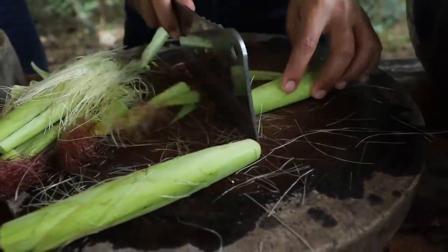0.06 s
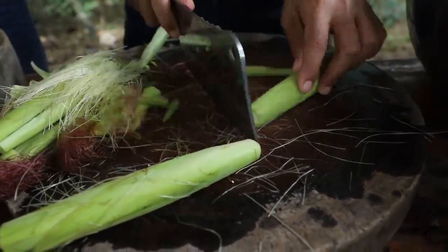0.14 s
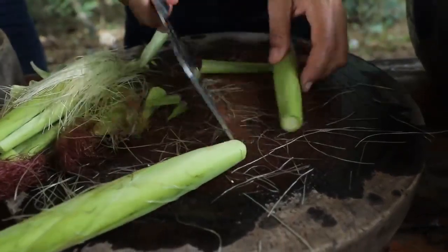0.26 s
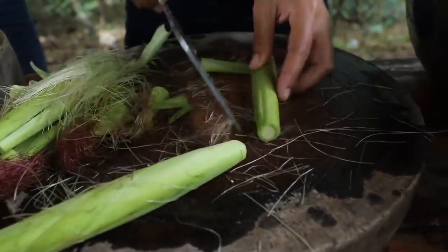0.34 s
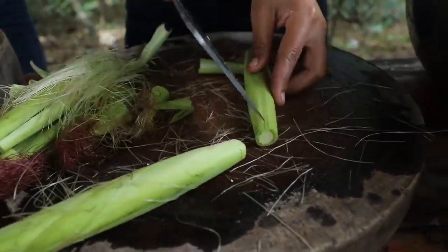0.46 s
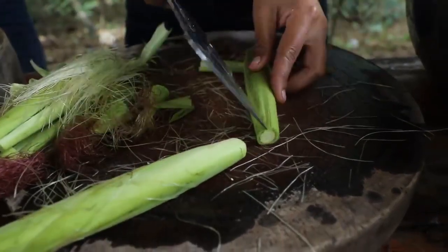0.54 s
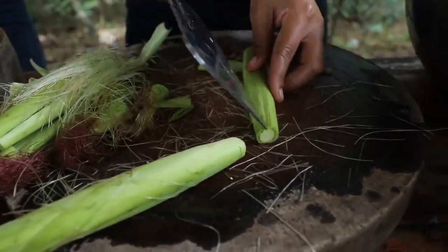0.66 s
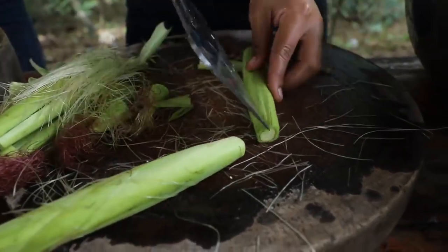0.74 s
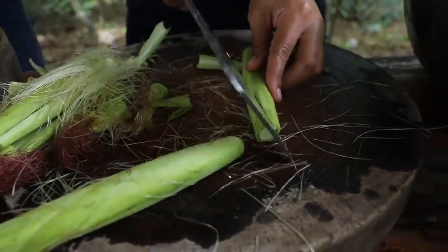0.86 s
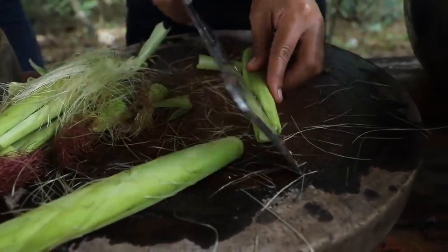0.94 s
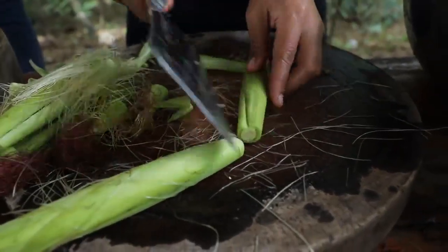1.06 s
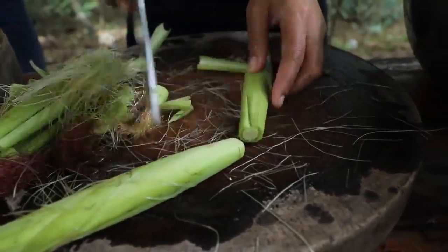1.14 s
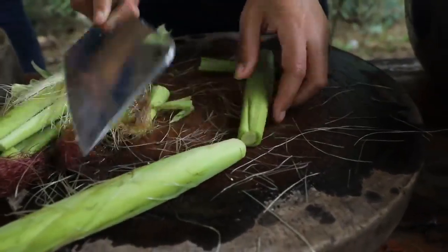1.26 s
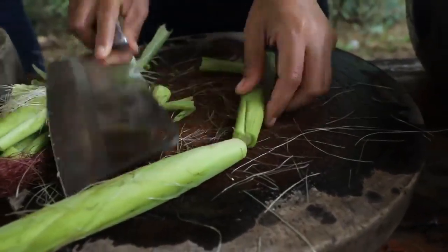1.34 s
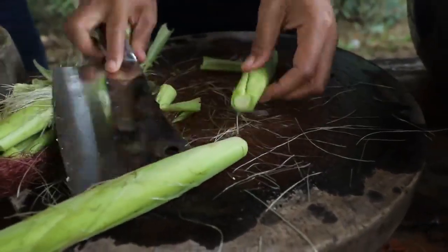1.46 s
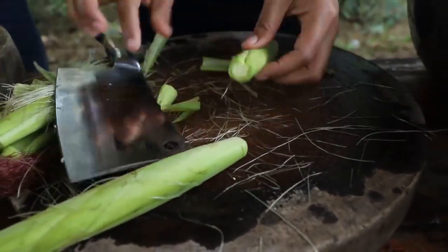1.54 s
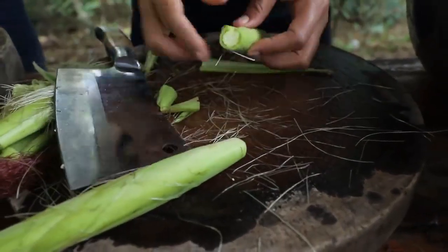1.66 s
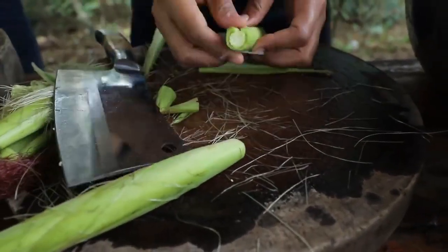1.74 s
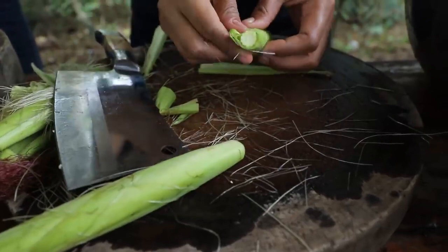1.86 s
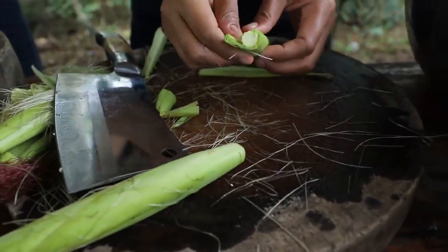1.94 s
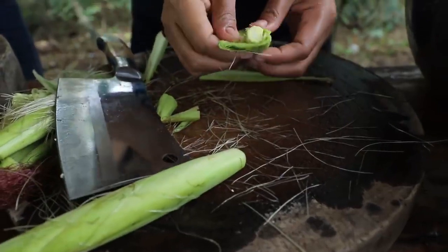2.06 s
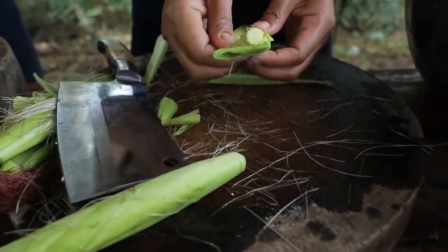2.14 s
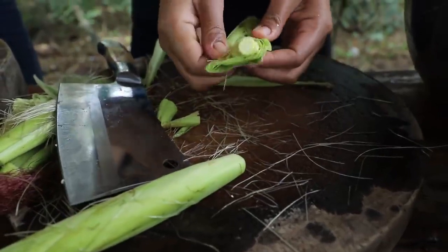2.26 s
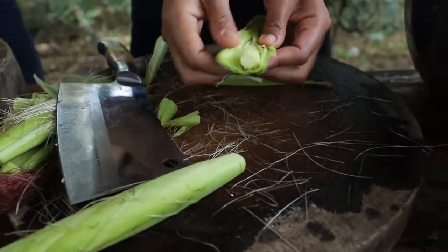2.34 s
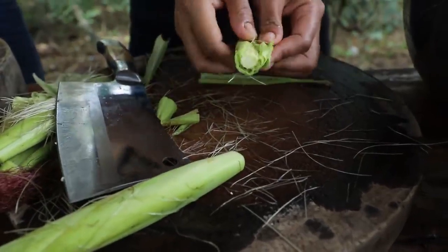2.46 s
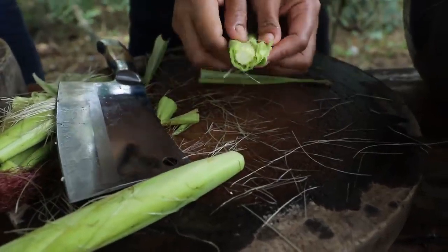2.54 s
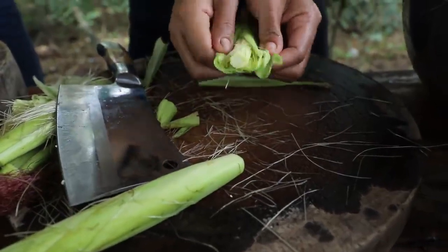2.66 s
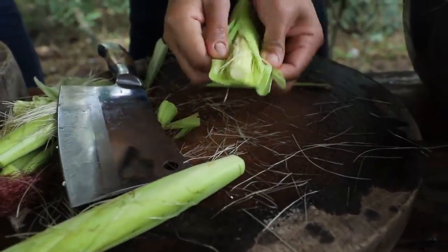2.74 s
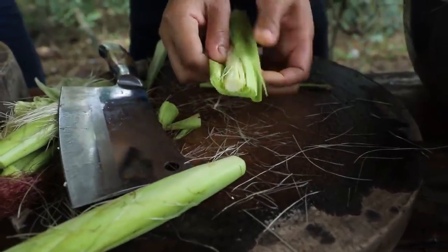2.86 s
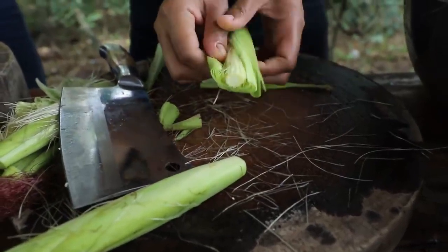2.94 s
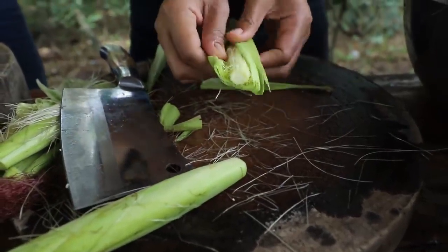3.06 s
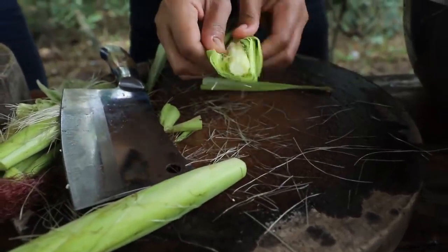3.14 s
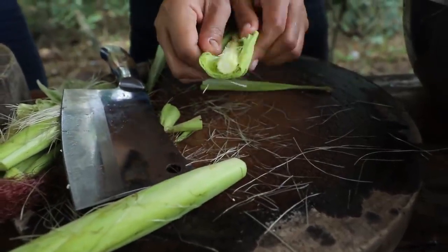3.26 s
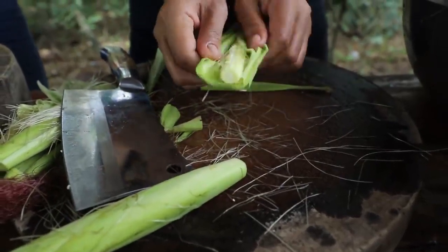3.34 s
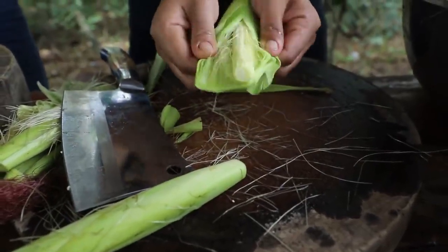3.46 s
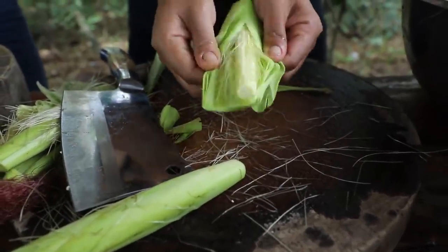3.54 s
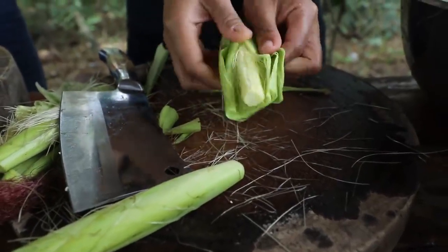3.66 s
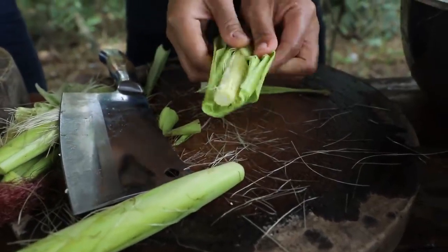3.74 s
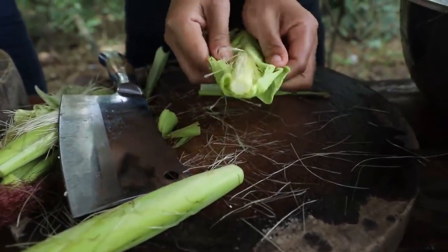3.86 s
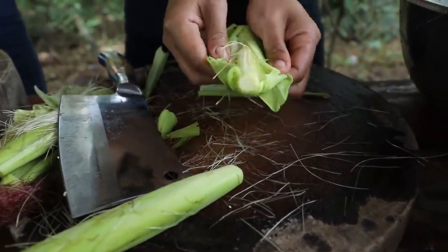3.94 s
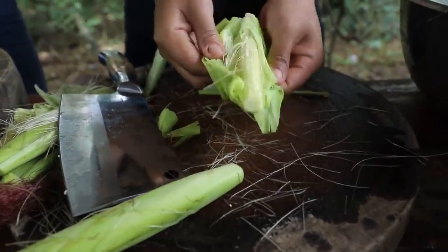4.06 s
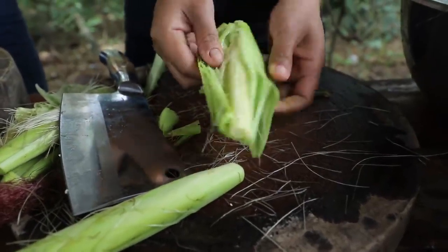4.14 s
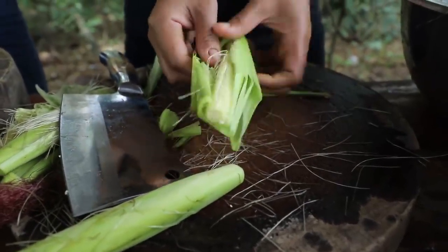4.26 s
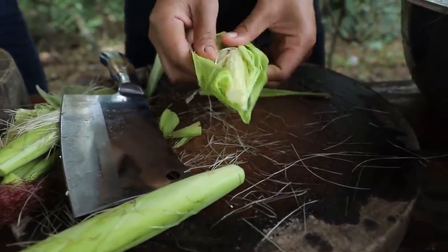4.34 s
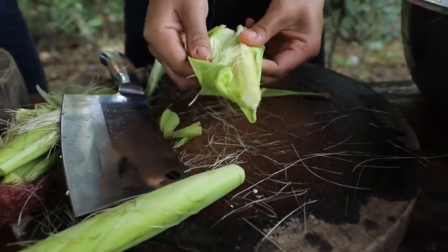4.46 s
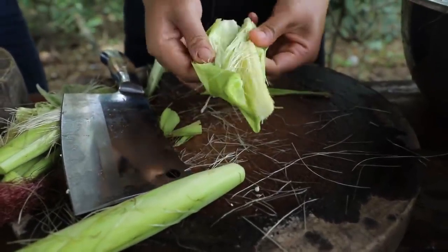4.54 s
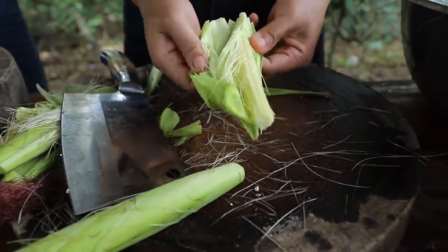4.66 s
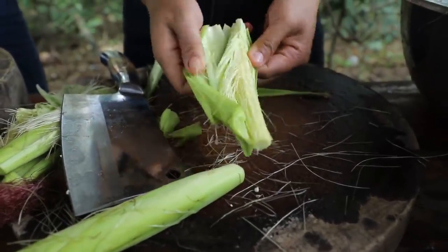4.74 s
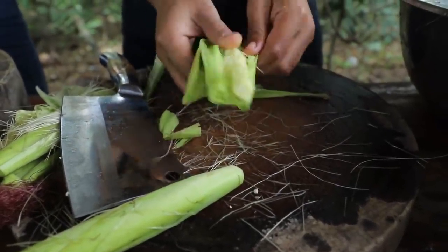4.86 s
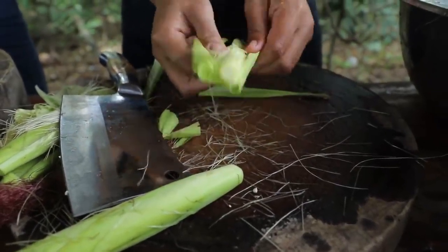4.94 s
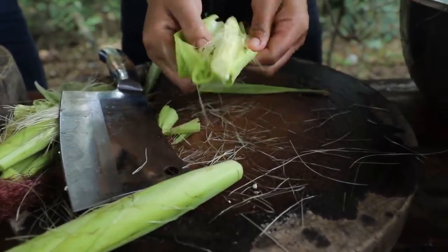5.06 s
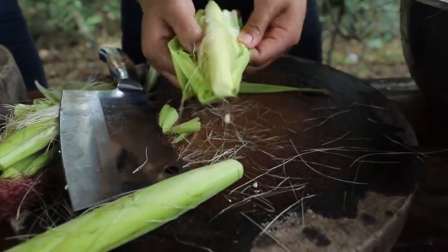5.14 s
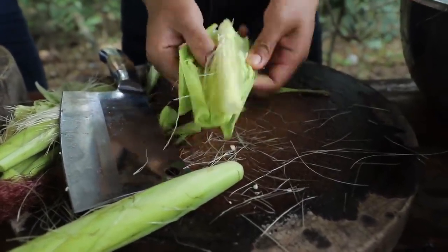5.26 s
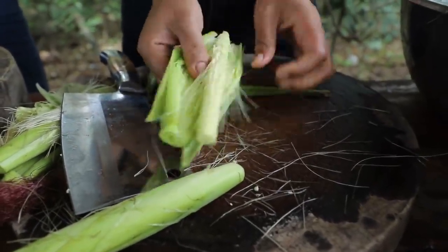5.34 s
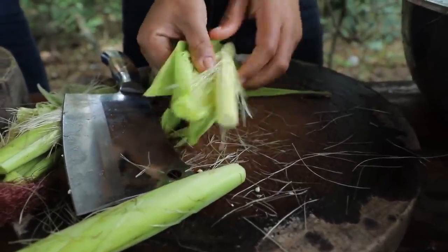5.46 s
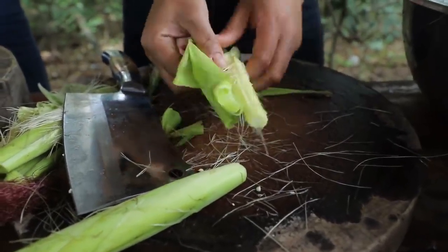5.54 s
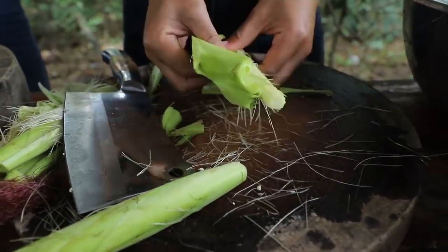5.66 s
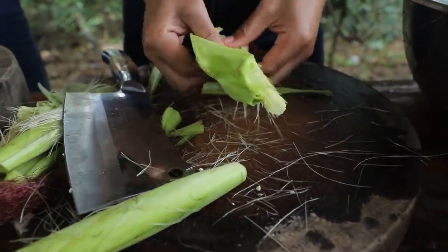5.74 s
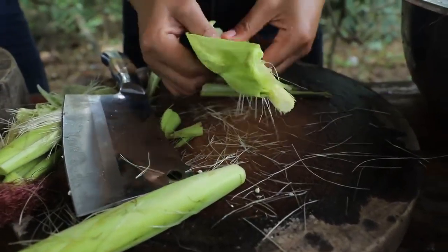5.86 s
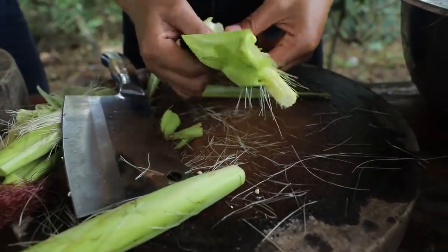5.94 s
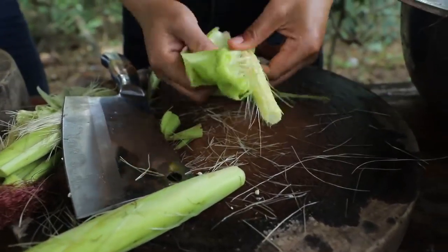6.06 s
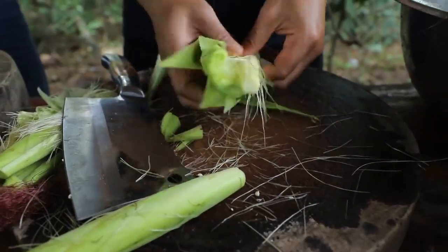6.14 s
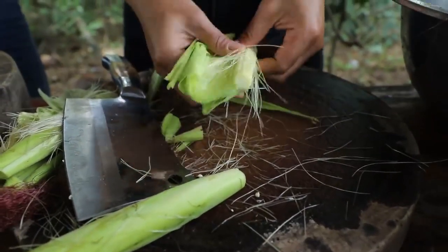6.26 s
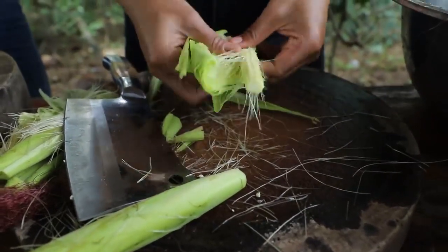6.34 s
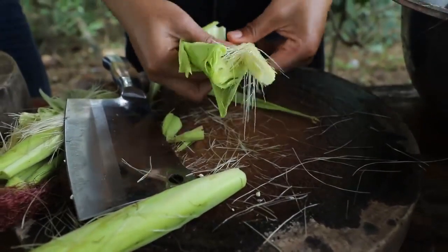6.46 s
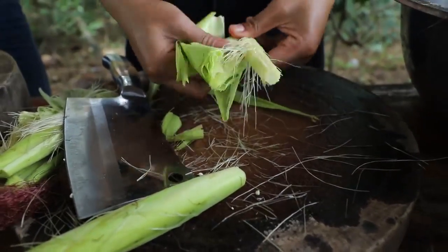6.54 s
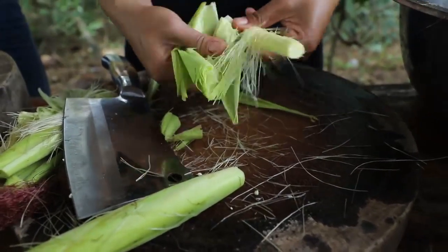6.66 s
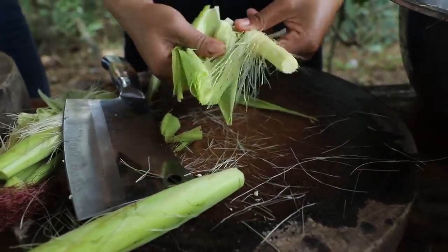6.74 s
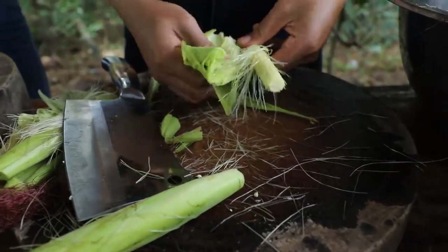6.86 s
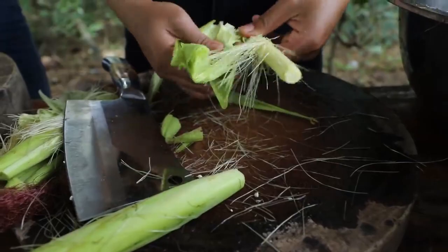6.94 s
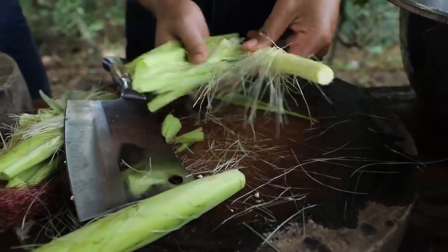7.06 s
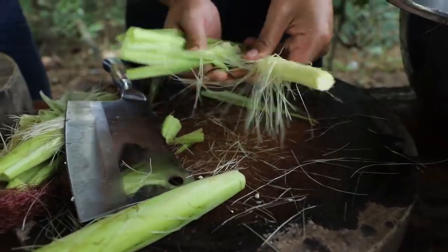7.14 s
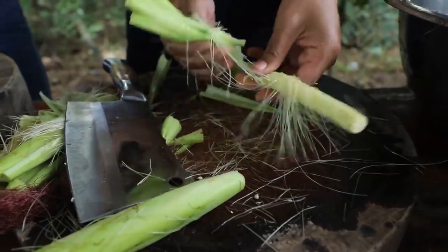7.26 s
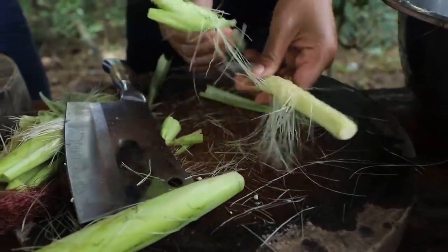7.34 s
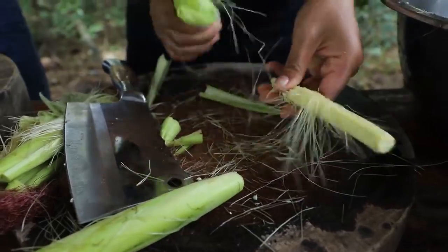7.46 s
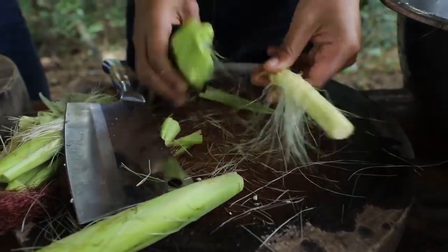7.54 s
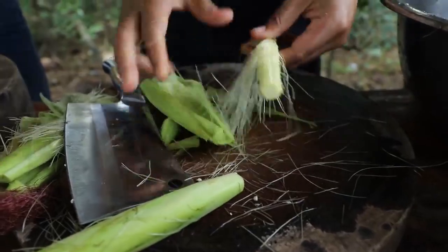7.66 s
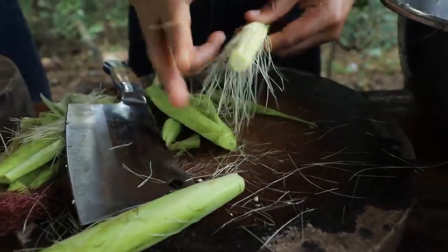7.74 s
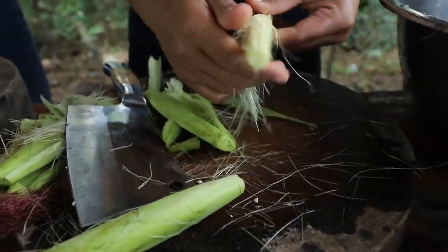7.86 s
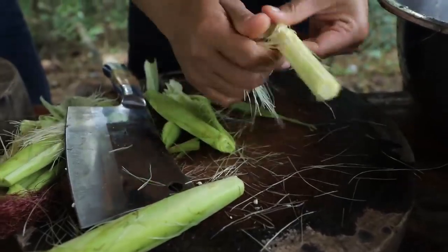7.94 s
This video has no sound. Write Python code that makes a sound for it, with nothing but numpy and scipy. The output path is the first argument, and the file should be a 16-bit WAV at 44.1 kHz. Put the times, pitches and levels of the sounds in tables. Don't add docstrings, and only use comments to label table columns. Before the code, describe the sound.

Outdoors, one loud chop and dry blade scrapes, a metallic clatter, then close crisp popping and tearing of fresh green corn husk.

```python
import sys
import numpy as np
from scipy import signal
from scipy.io import wavfile
from scipy.ndimage import uniform_filter1d

SR = 44100
rng = np.random.default_rng(int(sys.argv[2]) if len(sys.argv) > 2 else 0)


def amplitude_ratio(level_db):
    exponent = np.asarray(level_db, float) / 20
    return 10 ** exponent


def output_pcm(signal):
    pcm = np.clip(np.atleast_2d(signal).T, -1, 1) * 32767
    wavfile.write(sys.argv[1], SR, np.round(pcm).astype(np.int16))


N = 353239
TIME_S = np.arange(N) / SR

# (frequency [Hz], density [dB per Hz])
AIR_SPECTRUM = [(24, -10), (62, -2.5), (90, 2.5), (270, -7.5), (540, -12), (840, -11), (2600, -26.5),
                (4600, -23.5), (6000, -31), (10000, -41.5), (16500, -50)]
# (start [s], merge into held note [s], end [s], first pitch [Hz], last pitch [Hz])
SONGS = [
    (-.15, .38, .47, 4850, 4250),
    (.55, .565, .64, 4290, 4280),
    (1.85, 2.36, 2.47, 4050, 3580),
    (3.88, 4.37, 4.488, 5300, 4750),
    (4.7, 5.135, 5.19, 4600, 4200),
    (5.4, 5.88, 5.9, 4000, 3330),
    (7.6, 7.95, 7.995, 4300, 3980),
]
SONG_LEVELS = [-47.5, -52, -58, -46.5, -50, -51.5, -55.5]

# (time [s], ring [dB], crack [dB], contact hardness as cut-off [Hz])
CHOP = [
    (.1672, -30.5, 14, 8900),
    (.173, 28.5, 18, 2526),
    (.19, 16.5, -11, 900),
]
TICK = [
    (.399, -42, -48, 12100),
    (.43, -58, -55, 12000),
    (.667, -59, -52, 12000),
    (1.226, -45.5, -40, 7900),
]
LAID_DOWN = [
    (1.5335, -7, 6.5, 2630),
    (1.5385, -23.5, 1.5, 5750),
    (1.582, -37, -18, 9100),
]
CLATTER = [
    (2.809, -7.5, 4, 9280),
    (2.837, -34, -15.5, 14000),
    (2.876, -13.5, 1, 3320),
    (2.9335, -7, -7.5, 8500),
    (2.965, -37, -9, 5000),
]
BOUNCES = [
    (2.906, -23, -16, 2540),
    (2.984, -26.5, -17, 2620),
    (2.999, -34, -16, 2000),
    (3.012, -31, -39, 2040),
    (3.036, -34, -43, 1950),
    (3.047, -32, -34, 1900),
    (3.057, -38, -26, 1900),
]
DROPPED = [
    (.001, -34, -33, 700),
    (7.071, -24, -29, 1040),
]

# (frequency [Hz], level [dB], t60 [s])
BLOCK_MODES = [(77, -28, .22), (545, -23, .08), (207, -15, .16), (1696, -26, .1), (452, -21, .1),
               (620, -22, .1), (711, -60, .7), (937, -61, .6), (1084, -56.5, .9), (533, -58, .6),
               (856, -22, .09), (1035, -4, .06), (1265, -26, .1)]
# (frequency [Hz], level [dB], t60 [s])
BLADE_HELD_MODES = [(2450, -7, 0.3), (4430, 6.5, 0.034), (6460, 4, 0.07), (7400, -3, 0.12),
                    (8380, -4, 0.19), (9141, -4, 0.2), (10070, -1, 0.087), (11100, -2, 0.11),
                    (13100, -3, .1), (15300, -11, .07)]
# (frequency [Hz], level [dB], t60 [s])
BLADE_FLAT_MODES = [(76.8, -6, .3), (170, 3, .085), (1100, 6, .062), (395, -2, .07), (630, -8, .14),
                    (1662, 1, .16), (2444, -2.5, .18), (2772, 0, .22), (3488, -12, .2), (4958, 0, .08),
                    (5950, 0, .06), (1400, -16, .17), (2288, -15, .12), (112, -4, .1)]
# (frequency [Hz], level [dB], t60 [s])
BLADE_LOOSE_MODES = [(74, -11.5, .3), (172, -6, .077), (1170, -3, .043), (2850, -4, .03), (1846, -10, .15),
                     (625, -10, .12), (1518, 0, .16), (2360, -4, .07), (4065, -12, .12), (4576, -10.5, .22),
                     (5170, -6.5, .22), (5875, -12, .09), (6551, -18, .22), (8977, -11, .13),
                     (1766, 2, .035), (8300, -8, .03), (4720, 3, .025), (3698, -17, .1), (985, -17, .12),
                    (7290, -15, .08), (8834, -16, .15), (11350, -21, .1), (12460, -15, .05),
                    (14410, -22, .12), (15380, -22, .12)]
# (frequency [Hz], level [dB], t60 [s])
HANDLE_MODES = [(170, -1, 0.094), (636, 2.5, 0.095), (1494, 3, 0.1), (1770, 13.5, 0.052), (1030, -1, 0.1)]
# (frequency [Hz], level [dB], t60 [s])
BOARD_MODES = [(297, 0.5, 0.1), (705, -7.5, 0.3), (1010, -3, 0.1), (1187, -4, 0.12)]

# (loudest [s], level [dB], swell [s], fade [s], top end against middle [dB])
SCRAPES = [(.22, -37.5, 0.042, 0.21, -31.5), (0.469, -35, 0.066, 0.098, -28),
           (0.514, -35, 0.092, 0.039, -16.5), (.58, -50, 0.071, 0.026, -20.5),
           (0.936, -39.5, 0.022, .12, -7.5), (1.045, -32, 0.16, 0.046, -13.5),
           (1.212, -35, 0.068, 0.031, -18), (1.4, -46.5, 0.11, 0.16, -14),
           (1.765, -36.5, 0.076, 0.055, -23), (2.79, -37, 0.12, 0.23, -17), (3.105, -45, 0.032, 0.046, -31)]
# (loudest [s], level [dB], swell [s], fade [s])
PULLS = [(2.185, -35, 0.17, 0.064), (2.315, -36.5, 0.21, 0.071), (2.519, -43.5, 0.072, 0.087),
         (3.527, -35.5, 0.22, 0.35), (3.86, -44, 0.51, 0.094), (3.97, -31.5, 0.013, 0.049),
         (4.131, -35.5, 0.078, 0.11), (4.563, -31, 0.054, 0.073), (4.66, -40.5, 0.53, 0.72),
         (4.735, -21, 0.0083, 0.019), (4.799, -25, 0.0055, 0.018), (4.874, -39, 0.032, 0.28),
         (5.104, -39.5, 0.3, 0.014), (5.195, -20.5, 0.0093, 0.022), (5.3, -34.5, 0.14, 0.038),
         (5.468, -43.5, 0.14, 0.061), (5.577, -39, 0.06, 0.076), (5.662, -33.5, 0.031, 0.029),
         (5.937, -42.5, 0.14, 0.02), (6.056, -46.5, 0.093, 0.28), (6.271, -31, 0.025, 0.054),
         (6.585, -53, 1, 0.012), (6.765, -35, 0.076, 0.089), (7.024, -39.5, 0.055, 0.033),
         (7.12, -50, 1, 1), (7.332, -33, 0.1, 0.081), (7.498, -40.5, 0.1, 0.058),
         (7.69, -38.5, 0.022, 0.044), (7.784, -32, 0.066, 0.033), (7.907, -41.5, 0.038, 0.031)]
# (frequency [Hz], density [dB per Hz])
LEAF_SPECTRUM = [(400, -22), (800, -11), (1500, -4), (2300, -2), (3300, -4), (4500, 0), (5500, -4),
                 (11000, -14)]

# (time [s], peak [dB], leaf resonance [Hz])
NICKS = [(0.318, -39, 8020), (0.3648, -41.5, 9500), (0.9162, -27, 5000), (0.9685, -26, 3830),
         (1.0016, -27, 5220), (1.0363, -33, 4300), (1.1998, -34, 2890), (1.2183, -21, 4740),
         (1.2266, -20.5, 3400), (1.729, -22, 3750), (1.7748, -32.5, 1220), (1.8059, -30.5, 4560),
         (2.1338, -29, 4800), (2.1377, -26, 3700), (2.169, -26.5, 5400), (2.1957, -18.5, 4630),
         (2.2043, -24.5, 4600), (2.229, -27.5, 4500), (2.2535, -35, 4310), (2.3033, -28, 3450),
         (2.339, -35, 4630), (2.363, -30.5, 4630), (2.3673, -33.5, 1900), (2.7007, -29, 2070),
         (2.7356, -30, 4520), (2.76, -29.5, 6000), (2.7682, -26.5, 4280), (2.7756, -20, 4590),
         (2.78, -21.5, 4330), (2.7839, -21.5, 4540), (2.7863, -16.5, 4800), (2.7944, -22, 6000),
         (2.7989, -22, 2860), (3.261, -33, 2280), (3.298, -38.5, 2530), (3.3976, -28, 4940),
         (3.4383, -17.5, 4850)]
# (time [s], peak [dB], leaf resonance [Hz])
JUICY_SNAPS = [(3.4627, -33, 4130), (3.4661, -34.0, 2136), (3.4778, -27.5, 3240), (3.484, -30, 2220),
               (3.5079, -20.5, 2130), (3.5182, -28, 4220), (3.522, -28, 4580), (3.5384, -20, 4960),
               (3.554, -30, 2525), (3.5528, -29, 2074), (3.5641, -32, 2070), (3.5758, -34.5, 2070),
               (3.5896, -20, 2820), (3.5948, -23, 4650), (3.6125, -21, 4020), (3.6193, -31, 4290),
               (3.6417, -31.5, 4590), (3.6734, -21.5, 5800), (3.7256, -19, 5700), (3.7357, -28, 5540),
               (3.7408, -25, 4530), (3.7476, -27.5, 2070), (3.764, -24.5, 3940), (3.879, -24, 2200),
               (3.9539, -21, 2385), (3.958, -14.5, 2320), (3.964, -16.5, 2630), (3.9654, -22.5, 2077),
               (3.9702, -24, 2500), (3.9751, -28, 1720), (3.9842, -26, 2540), (3.988, -17.5, 4260),
               (3.9903, -11, 3960), (3.9975, -17, 2370), (4.0042, -9.5, 2900), (4.0078, -19, 3020),
               (4.0102, -23.5, 4650), (4.015, -22, 4730), (4.022, -23.5, 4660), (4.0249, -34, 2920),
               (4.03, -29, 4920), (4.053, -32, 4740), (4.062, -20, 4210), (4.07, -18, 1904),
               (4.0819, -13, 4300), (4.0994, -19, 4460), (4.112, -37, 2760), (4.1175, -18, 2930),
               (4.1246, -7, 3520), (4.127, -28.5, 4050), (4.139, -31, 4400), (4.1465, -40, 3180),
               (4.154, -28, 4160), (4.165, -33, 2074), (4.172, -32, 2760), (4.177, -29, 4310),
           (4.1905, -34, 2410), (4.2069, -15.5, 2904), (4.208, -20.5, 3730), (4.2173, -37, 2930),
           (4.3018, -29.5, 4900), (4.5435, -26, 3760), (4.555, -19, 3140), (4.559, -22, 3890),
           (4.5637, -17, 4030), (4.5692, -25, 3030), (4.5772, -22, 3120), (4.5875, -26, 2670),
           (4.6026, -32, 4220), (4.6338, -16.5, 4260), (4.6436, -16.5, 2500), (4.649, -36, 2230),
           (4.6604, -17.5, 6720), (4.6627, -29, 4760), (4.6762, -22, 4890), (4.681, -28, 4840),
           (4.696, -20, 4900), (4.7081, -13, 6460), (4.8677, -19, 5400), (4.7259, -14.5, 2070),
           (4.736, -13.5, 3700), (4.7434, -29, 4990), (4.7663, -26, 2100), (4.7902, -20, 5100),
           (4.796, -23, 5000), (4.804, -21, 3500), (4.807, -22, 4490), (4.8104, -24, 4910),
           (4.825, -29, 5000), (4.8407, -34.5, 4660), (4.8495, -24, 3540), (4.8591, -28, 3530),
           (4.8637, -11, 5440), (4.8765, -22, 5300), (4.881, -27.0, 5450), (4.8904, -22.5, 5560),
           (4.9518, -27.5, 4190),
               (5.052, -37, 3270), (5.091, -23, 4050), (5.095, -16.5, 2800), (5.107, -23, 4890),
             (5.1237, -32, 7600), (5.1768, -35, 7840), (5.182, -10.5, 3820), (5.188, -25.5, 2760),
             (5.1929, -35, 4390), (5.1965, -14.5, 5070), (5.1967, -15, 4360), (5.2046, -14.5, 3960),
             (5.2081, -27, 4030), (5.2173, -27, 4570), (5.222, -30, 4740), (5.2312, -34, 4130),
             (5.2332, -26, 5860), (5.2362, -29, 7240), (5.242, -19, 6000), (5.2496, -28, 6890),
             (5.2523, -18, 4390), (5.2588, -13.5, 4470), (5.2638, -25, 3880), (5.2666, -17, 4430),
             (5.2704, -35, 4570), (5.283, -24, 4180), (5.2844, -18.5, 4800), (5.2973, -37, 4650),
             (5.298, -32, 4220), (5.3056, -1.5, 5160), (5.307, -5.5, 4720), (5.3115, -11.5, 4360),
             (5.325, -22, 4330), (5.3336, -24, 4200), (5.3437, -22.5, 4810), (5.3479, -26, 4480),
             (5.3614, -33.5, 4420), (5.5713, -27.5, 2110), (5.634, -40, 12000), (5.655, -22.5, 5200),
             (5.658, -21.5, 4700), (5.662, -25, 4860), (5.731, -29.5, 3870), (5.8055, -30, 5400),
             (5.823, -22.5, 5100), (5.8426, -29, 4430), (5.866, -28.5, 6460), (5.9246, -26.5, 2330),
             (5.939, -29, 4500), (5.9541, -35, 4540), (6.0463, -30, 4610), (6.0536, -30, 4740)]
# (time [s], peak [dB], leaf resonance [Hz])
CRISP_SNAPS = [(6.2681, -27.5, 3810), (6.3035, -34, 4940), (6.3508, -23.5, 7540), (6.516, -18.5, 3080),
               (6.5206, -29, 4560), (6.537, -32, 9000), (6.5585, -21.0, 5160), (6.6004, -9, 4800),
               (6.606, -22, 4690), (6.6148, -28.5, 3340), (6.616, -6, 6600), (6.6285, -11.5, 5300),
               (6.648, -9.5, 2800), (6.6605, -27, 5140), (6.665, -38, 5440), (6.682, -25, 6120),
               (6.6972, -23.5, 6250), (6.7062, -26, 4430), (6.7154, -35, 3960), (6.731, -27, 5200),
               (6.7404, -16, 5600), (6.7535, -0.5, 3850), (6.7576, -6, 4400), (6.76, -7.5, 4670),
               (6.766, -22, 5170), (6.7753, -21, 5090), (6.782, -17.5, 4500), (6.8077, -40, 4150),
               (6.812, -24.5, 6460), (6.818, -31, 6270),
               (6.9293, -30, 7700), (7.014, -34, 7500), (7.021, -26, 6000), (7.0615, -30, 7230),
           (7.1018, -19, 6600), (7.1128, -28, 6960), (7.1688, -32, 5680), (7.1943, -16, 5600),
           (7.2335, -6.5, 4260), (7.0712, -33, 9000), (7.2792, -13.5, 4520), (7.2891, -32, 3130),
           (7.291, -25, 3950), (7.2965, -16, 3750), (7.3093, -18, 5500), (7.3221, -35, 2580),
           (7.325, -22, 1690), (7.3319, -14.5, 6600), (7.3346, -26.5, 2580), (7.3372, -16.5, 4340),
           (7.3422, -19, 6100), (7.3514, -16, 9390), (7.427, -27, 4030), (7.472, -29, 3300),
           (7.4828, -29, 4420), (7.4887, -13.5, 7600), (7.4923, -21, 3170), (7.5248, -35, 1810),
           (7.554, -31, 4640), (7.5718, -31, 4300), (7.5834, -37, 4900), (7.6783, -31, 4800),
           (7.7463, -21, 4300), (7.7712, -26, 4130), (7.7713, -23, 4260), (7.7907, -30, 3580),
           (7.7927, -35, 3010), (7.9084, -32, 4990)]
# (time [s], peak [dB], resonance [Hz])
RIBS = [
    (1.2274, -26.5, 930),
    (3.3973, -28.5, 1270),
    (3.4387, -19.5, 1230),
    (5.1821, -22, 1130),
    (5.5755, -25.5, 1010),
    (6.7551, -17, 1130),
]
# (time [s], peak [dB], frequency [Hz], t60 [s])
THUMPS = [(0.399, -30.5, 95.6, 0.5), (0.666, -30, 81.8, 0.51), (0.914, -25.5, 101, 0.12),
          (1.059, -15.5, 99, 0.12), (1.291, -34.5, 78.5, 0.34), (1.729, -34.5, 85, 0.68),
          (2.304, -20, 231, 0.081), (2.324, -20.5, 84.5, 0.11), (2.326, -14, 197, 0.044),
          (2.339, -20, 213, 0.12), (7.067, -35, 87.5, 0.53)]

AIR_DB, HUM_HZ, HUM_DB = -46, 45.5, -54
TRILL_DB = -4
RATTLE_DB, RATTLE_PER_S = 1.6, 70
HUSKING_FROM_S, HOLDING_DB = 1.95, -75
STROKE_RANGE_DB = 20
LEAF_TOP_DB, DULLER_PER_DB = -21, 0.5236
STRETCH_S, GIVE_T60_S = .0025, .007


def band(x, low_hz, high_hz):
    return signal.sosfilt(signal.butter(2, [low_hz, high_hz], "band", fs=SR, output="sos"), x)


def rms_one(x):
    return x / np.sqrt(np.mean(x ** 2) + 1e-20)


def ring(x, hz, t60_s):
    radius = amplitude_ratio(-60 / (t60_s * SR))
    w = 2 * np.pi * hz / SR
    return signal.lfilter([0, np.sin(w)], [1, -2 * radius * np.cos(w), radius * radius], x + 1e-18)


def drift(rate_hz):
    points = rng.standard_normal(2000)
    return np.interp(TIME_S * rate_hz, np.arange(len(points)), points)


def coloured(sources, spectrum, patchy_db):
    hz, level_db = np.transpose(spectrum)
    edges_hz = np.geomspace(hz[0], hz[-1], int(2 * np.log2(hz[-1] / hz[0])) + 2)
    out = 0
    for k, (low_hz, high_hz) in enumerate(zip(edges_hz, edges_hz[1:])):
        centre_db = np.interp(np.log(low_hz * high_hz) / 2, np.log(hz), level_db)
        gain = amplitude_ratio(centre_db + patchy_db * drift(25))
        out = out + gain * band(sources[k % 2], low_hz, high_hz)
    return rms_one(out)


def open_air():
    floor = amplitude_ratio(AIR_DB) * coloured(rng.standard_normal((2, N)), AIR_SPECTRUM, patchy_db=2.33)
    hum = amplitude_ratio(HUM_DB + 1.5 * drift(3.0)) * np.sin(2 * np.pi * HUM_HZ * TIME_S)
    return floor + hum


def birds():
    out = np.zeros(N)
    for (start_s, merge_s, end_s, first_hz, last_hz), level_db in zip(SONGS, SONG_LEVELS):
        trill_s = merge_s - start_s
        progress = np.clip((TIME_S - start_s) / trill_s, 0, 1)
        pip = np.cumsum(95 - 50 * progress ** 2) / SR % 1
        duty = .55 + .45 * progress ** 3
        gate = np.where(progress < 1, np.sin(np.pi * np.clip(pip / duty, 0, 1)), 1)
        slur_hz = 480 * (1 - progress ** 3) * (pip / duty - .5)
        hz = last_hz + (first_hz - last_hz) * (1 - progress) + slur_hz
        rise, fall = (TIME_S - start_s) / (0.45 * trill_s), (end_s - TIME_S) / 0.015
        edges = np.clip(np.minimum(rise, fall), 0, 1)
        gain = amplitude_ratio(level_db + TRILL_DB * (1 - progress ** 6) + 2.5 * drift(45))
        whistle = np.sin(2 * np.pi * np.cumsum(hz) / SR)
        out += gain * edges * uniform_filter1d(gate, size=60) * whistle
    return out


def blows(rows, modes, crack_t60_s, echo_db):
    out, size = np.zeros(N + SR), SR // 2
    age_s, click = np.arange(size) / SR, np.eye(1, size)[0]
    fade = np.minimum(1, age_s / 0.00044) * np.cos(np.pi * age_s) ** .5
    for s, ring_db, crack_db, hard_hz in rows:
        spread_db = rng.normal(0, .9, len(modes))
        noise = rng.standard_normal(size)
        sound = np.zeros(size)
        for (hz, level_db, t60_s), mode_db in zip(modes, spread_db):
            waver_db = mode_db + RATTLE_DB * drift(RATTLE_PER_S)[:size]
            softness = 1 + (hz / hard_hz) ** 2
            sound += amplitude_ratio(ring_db + level_db + waver_db) / softness * ring(click, hz, t60_s)
        for hz in 250 * 2.0 ** np.arange(6):
            crack = amplitude_ratio(-60 * age_s / (crack_t60_s * (hz / 1000) ** -.35))
            echoes = amplitude_ratio(echo_db - 60 * age_s / 0.21)
            gain = amplitude_ratio(crack_db) / (1 + (hz / hard_hz) ** 4.4) * (2000 / hz) ** 0.29
            sound += gain * (crack + echoes) * band(noise, hz, min(2 * hz, 14000))
        out[round(s * SR):][:size] += sound * fade
    return band(out[:N], 50, 22000)


def bumps():
    return blows(DROPPED, BOARD_MODES, crack_t60_s=0.28, echo_db=-27.0)


def cleaver():
    chop = blows(CHOP, BLOCK_MODES, crack_t60_s=0.074, echo_db=-39.5)
    tick = blows(TICK, BLADE_HELD_MODES, crack_t60_s=0.033, echo_db=-40.5)
    laid_down = blows(LAID_DOWN, BLADE_FLAT_MODES, crack_t60_s=0.022, echo_db=-17.5)
    clatter = blows(CLATTER, BLADE_LOOSE_MODES, crack_t60_s=0.0384, echo_db=-27.0)
    handle = blows(BOUNCES, HANDLE_MODES, crack_t60_s=0.098, echo_db=-42)
    return chop + tick + laid_down + clatter + handle


def effort_db(strokes, roundness=1):
    curves_db = []
    for s, level_db, swell_s, fade_s, *_ in strokes:
        distance = np.maximum((s - TIME_S) / swell_s, (TIME_S - s) / fade_s)
        curves_db.append(level_db - STROKE_RANGE_DB * distance ** roundness)
    return np.array(curves_db)


def rustle():
    husking = TIME_S > HUSKING_FROM_S
    strokes_db = effort_db(SCRAPES, roundness=1.5)
    blade_db = strokes_db.max(axis=0)
    pull_db = np.maximum(effort_db(PULLS).max(axis=0), np.where(husking, HOLDING_DB, -99))
    level_db = np.maximum(blade_db, pull_db)
    blade_top_db = np.array(SCRAPES)[strokes_db.argmax(axis=0), -1]
    leaf_top_db = LEAF_TOP_DB - DULLER_PER_DB * (pull_db + 47.0)
    top_db = np.where(blade_db > pull_db, blade_top_db, leaf_top_db)

    slips_per_s = np.where(husking, 3000, 9000) * amplitude_ratio(np.where(husking, 4.5, 2.5) * drift(160))
    size_db = np.where(husking, 4.0, 3.0) * np.minimum(rng.exponential(1, (2, N)), 4)
    sizes = amplitude_ratio(size_db) * rng.standard_normal((2, N))
    slips = sizes * (rng.random((2, N)) < slips_per_s / SR)
    husk_power, blade_power = np.mean(slips[:, husking] ** 2), np.mean(slips[:, ~husking] ** 2)
    slips /= np.sqrt(np.where(husking, husk_power, blade_power))

    middle = coloured(slips, LEAF_SPECTRUM, patchy_db=np.where(husking, 3.5, 1.8))
    top = rms_one(band(slips.sum(0), 7500, 14500))
    return amplitude_ratio(level_db - 3.5) * (middle + amplitude_ratio(top_db + 8.5) * top)


def snaps():
    out, size, lead = np.zeros(N + SR), 900, round(STRETCH_S * SR)
    age_s = np.arange(size) / SR - STRETCH_S
    juicy = JUICY_SNAPS
    crisp = NICKS + CRISP_SNAPS + RIBS
    creak = amplitude_ratio(-7 + 60 * age_s / GIVE_T60_S)
    after = amplitude_ratio(-2 - 60 * age_s / 0.007) + amplitude_ratio(-27.5 - 60 * age_s / 0.022)
    for k, (s, peak_db, hz) in enumerate(juicy + crisp):
        is_juicy = k < len(juicy)
        clicks = (rng.random(size) < 6000 / SR) * rng.standard_normal(size)
        volley = clicks * np.where(age_s < 0, creak * is_juicy, after)
        volley[lead] = 1.1
        body = ring(volley, hz, min(13 / hz, .004))
        body += .3 * ring(volley, 4600, .004)
        body += 1.9 * band(volley, .5 * hz, min(1.8 * hz, 14000))
        top = amplitude_ratio(-22 if is_juicy else -14) * rms_one(band(volley, 3500, 14000))
        sound = band(rms_one(body), 0.16 * hz, 21000) + top
        out[round(s * SR) - lead:][:size] += amplitude_ratio(peak_db + 1.5) * sound / np.abs(sound).max()
    return out[:N]


def thumps():
    out = np.zeros(N + SR)
    push = np.zeros(SR // 2)
    push[:100] = np.hanning(100)
    for s, peak_db, hz, t60_s in THUMPS:
        sound = ring(push, hz, t60_s) + 0.41 * ring(push, 1.9 * hz, .5 * t60_s)
        out[round(s * SR):][:len(push)] += amplitude_ratio(peak_db) * sound / np.abs(sound).max()
    return out[:N]


def scene():
    surroundings = open_air() + birds()
    hands = rustle() + snaps() + thumps()
    return (surroundings + bumps() + cleaver() + hands)[None]


def band_limit(x):
    return signal.sosfilt(signal.butter(12, 16050, fs=SR, output="sos"), x)


def record(dry):
    clipped = np.clip(dry, -.97, .97)
    cut = signal.sosfilt(signal.cheby2(14, 70, 16800, fs=SR, output="sos"), clipped)
    cut = signal.sosfilt(signal.butter(2, 24, "high", fs=SR, output="sos"), cut)
    return band_limit(cut)


dry = scene()
out = record(dry)
output_pcm(out)
```